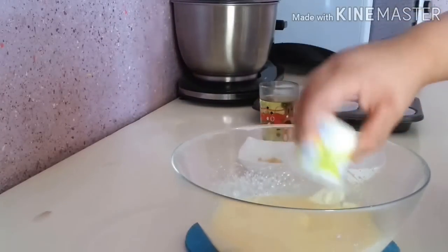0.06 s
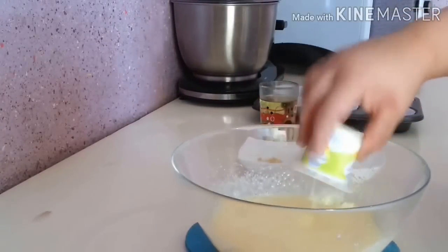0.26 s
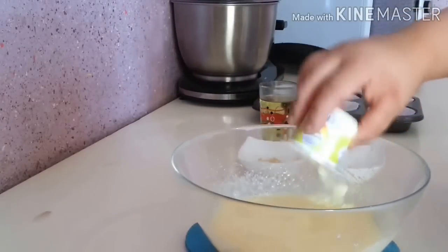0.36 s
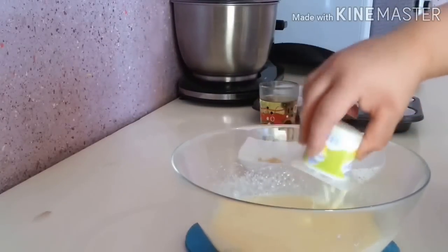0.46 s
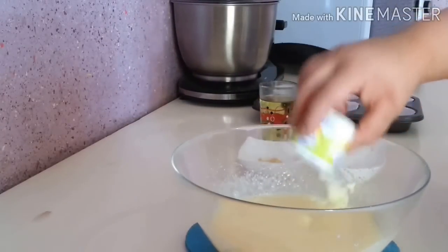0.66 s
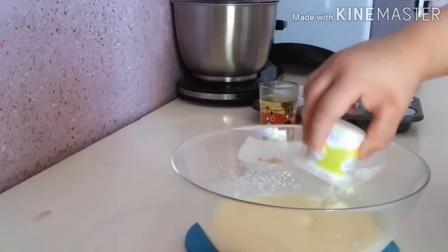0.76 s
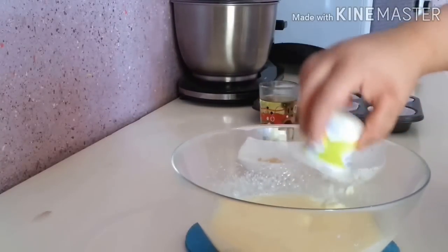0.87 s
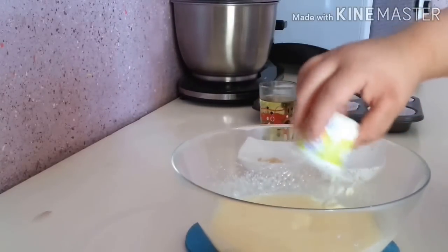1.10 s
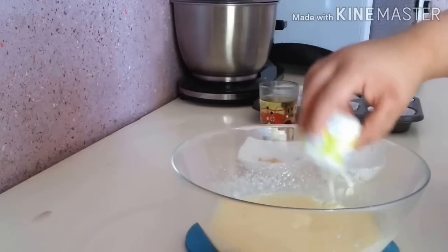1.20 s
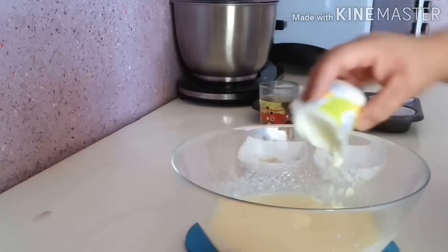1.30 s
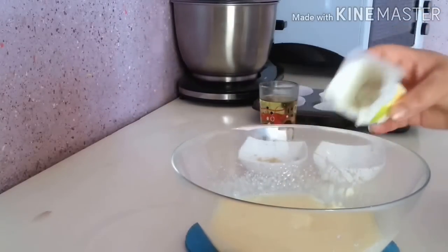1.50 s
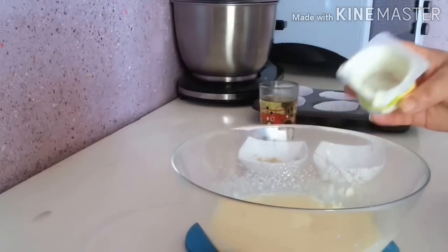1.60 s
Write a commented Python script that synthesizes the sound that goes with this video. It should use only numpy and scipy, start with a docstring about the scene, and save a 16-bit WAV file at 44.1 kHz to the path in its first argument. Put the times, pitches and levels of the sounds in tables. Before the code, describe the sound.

A plastic yogurt pot raps on a glass mixing bowl. After a faint plastic tick at about 0.1 seconds, eight sharp, hollow knocks run from 0.2 to 1.3 seconds, about equally loud and gradually speeding up. Each makes the glass ring lightly, with a short echo from the small kitchen. After the last knock, the ring fades into low room hiss by about 1.6 seconds.

```python
"""Low room hiss fills a small kitchen, and a plastic yogurt pot gives one faint tick in the hand.
The pot is then rapped eight times, ever faster, on a glass mixing bowl. Each impact excites free
vibrations: the pot's wall cracks, its base pops, its hollow thumps and the lightly damped glass rings.
The hard walls answer with reflections, and after the last rap the bowl rings down into the hiss."""
import sys
import numpy as np
from scipy import signal
from scipy.fft import rfft, irfft, next_fast_len
from scipy.io import wavfile

SR = 44100
rng = np.random.default_rng(int(sys.argv[2]) if len(sys.argv) > 2 else 0)


def output_pcm(signal):
    """Save a mono or channel-first signal as 16-bit PCM at the path in sys.argv[1].

    Samples are clipped to [-1, 1] before scaling.
    """
    pcm = np.clip(np.atleast_2d(signal).T, -1, 1) * 32767
    wavfile.write(sys.argv[1], SR, np.round(pcm).astype(np.int16))


N = 72765
SIDES = np.array([[.5], [-.5]])  # splits a left-right difference between the channels


def amp(db):
    """Decibels to amplitude ratio."""
    return 10 ** (np.asarray(db) / 20)


def along(points, hz):
    """Interpolation on a logarithmic frequency axis."""
    f, v = np.transpose(points)
    return np.interp(np.log(hz + 1), np.log(f + 1), v)


def filtered(x, response):
    """Linear filtering: spectrum times frequency response."""
    m = next_fast_len(N + SR // 2)
    return irfft(rfft(x, m) * response(np.fft.rfftfreq(m, 1 / SR)), m)[..., :N]


def coloured(x, curve_db):
    """Minimum-phase filtering: folding the cepstrum makes a dB curve causal."""
    m = 2 * next_fast_len(N)
    cepstrum = irfft(np.log(amp(curve_db(np.fft.rfftfreq(m, 1 / SR)))))
    cepstrum[1:m // 2] *= 2
    cepstrum[m // 2 + 1:] = 0
    return irfft(rfft(x, m) * np.exp(rfft(cepstrum)))[..., :N]


def highpass(x, hz, order):
    """Causal high-pass filtering."""
    return signal.sosfilt(signal.butter(order, hz, "high", fs=SR, output="sos"), x)


def since(s):
    """Seconds after s, zero before."""
    return np.maximum(np.arange(N) / SR - s, 0)


def rise(t, tau_s):
    """Exponential build-up."""
    return 1 - np.exp(-t / tau_s)


def mode(t, hz, t60_s, phase=0):
    """Damped harmonic oscillation."""
    return np.sin(2 * np.pi * hz * t + phase) * amp(-60 * t / t60_s)


def burst(t, t60_s):
    """Exponentially decaying noise."""
    return (t > 0) * rng.standard_normal(N) * amp(-60 * t / t60_s)


def cohered(pair, coherence):
    """Partial coherence: the balance of mid and side sets how alike two channels are."""
    def weights(f):
        angle = np.arccos(along(coherence, f)) / 2
        return np.array([np.cos(angle), np.sin(angle)])
    mid, side = filtered(pair, weights)
    return np.array([mid + side, mid - side])


# Spectrum of the room noise (frequency [Hz], level [dB])
HISS_SPECTRUM = [(18, -45), (30, -12.5), (160, -6), (197, -8), (324, 2), (420, -5.5), (575, -4),
                 (673, -6.5), (1020, -10.5), (2490, -12), (3590, -14), (4910, -16.5), (7460, -20),
                 (14000, -21.5), (15500, -68)]
# Its envelope (time [s], level [dB])
HISS_ENVELOPE = [(0, -48), (0.132, -49.5), (0.209, -50.5), (1.65, -51.5)]
# Its left-right likeness (frequency [Hz], coherence [1])
HISS_COHERENCE = [(50, 0.18), (200, 0.72), (800, 0.17), (3000, 0.083), (12000, 0.16)]
def hiss():
    """Ambient noise: a quiet random field, most coherent in the bass."""
    noise = cohered(rng.standard_normal((2, N)), HISS_COHERENCE)
    noise = filtered(noise, lambda f: amp(along(HISS_SPECTRUM, f)))
    level_db = np.interp(since(0), *np.transpose(HISS_ENVELOPE))
    return amp(level_db) * noise / np.sqrt(np.mean(noise ** 2))


def tick(start_s=.0886, centre_hz=4230, width_hz=1800):
    """Noise-excited resonance: the pot creaks softly once in the grip."""
    t = since(start_s)
    rub = burst(t, t60_s=0.021) * rise(t, 0.00052)
    resonance_db = lambda f: -10 * np.log10(1 + ((f - centre_hz) / (width_hz / 2)) ** 2)
    return amp(-25) * coloured(rub, resonance_db)


# Balance of the direct sound (frequency [Hz], left minus right [dB])
BALANCE = [(250, -.5), (1400, -1.5), (3000, 2.5), (5000, -5), (8000, -9), (14000, 0)]
def propagated(x, right_lag_s=.00003, echo_s=0.027):
    """Superposition of direct sound, early reflections and reverberation."""
    direct = filtered(x, lambda f: amp(SIDES * along(BALANCE, f))
                      * np.exp(2j * np.pi * f * right_lag_s * SIDES))
    # Bowl, worktop and the wall beside it reflect first.
    scatter = np.array([burst(since(0.0024), t60_s=0.042) for _ in range(2)])[:, :SR // 10]
    near = signal.fftconvolve(direct, scatter / np.linalg.norm(scatter[0]), axes=1)[:, :N]
    echo = filtered(near, lambda f: np.exp(-2j * np.pi * f * echo_s))  # nearest kitchen wall
    left, right = amp(-7) * near + amp(-16) * echo + amp(-2.5) * reverberation(x)
    mid_side = np.array([left + right, left - right]) / np.sqrt(2)
    # At two close points a diffuse field is alike in the bass.
    return direct + cohered(mid_side, coherence=[(250, 0.47), (600, 0.53), (1400, 0)])


# Reverberation time of the kitchen (frequency [Hz], T60 [s])
ROOM_DECAY = [(150, 0.47), (400, 0.3), (1200, 0.61), (2800, 0.54), (7000, 0.52), (14000, 0.3)]
# Colour of its reverberation (frequency [Hz], gain [dB])
ROOM_SPECTRUM = [(100, 4), (230, 1), (320, -6), (420, 5.5), (750, 6), (950, 3.5), (1400, -3), (2000, 0.5),
                 (4500, -0.5), (8000, 0.5), (13000, -2)]
def reverberation(x):
    """Diffuse decay: each frequency dies away at its own rate."""
    hz, t, spectra = signal.stft(rng.standard_normal((2, SR * 2 // 3)), SR, nperseg=256)
    tail = signal.istft(spectra * amp(-60 * t / along(ROOM_DECAY, hz)[:, None]), SR, nperseg=256)[1]
    tail *= rise(np.arange(tail.shape[1]) / SR, 0.0017)
    wet = signal.fftconvolve(x[None], tail / np.linalg.norm(tail[0]), axes=1)[:, :N]
    return filtered(wet, lambda f: amp(along(ROOM_SPECTRUM, f) + 0.61 * SIDES * along(BALANCE, f)))


# Stiff modes of the pot's wall (frequency [Hz], level [dB], T60 [s])
WALL_MODES = [(1254, -19, 0.058), (1950, -13.5, 0.0052), (2680, -12, 0.0065), (2971, -16.5, 0.028),
              (3647, -15.5, 0.016), (4488, -27.5, 0.021), (5620, -35, 0.0053), (7770, -40.5, .008),
              (8390, -20, 0.0074)]
def pot_wall(t):
    """Modal superposition: the wall's modes start together, alternating in sign."""
    return sum((-1) ** (k + 1) * amp(db + rng.normal(0, 1)) * mode(t, hz, t60)
               for k, (hz, db, t60) in enumerate(WALL_MODES))


# Snap of the plastic (frequency [Hz], gain [dB])
CRACK_SPECTRUM = [(60, -48), (170, -42), (280, -7), (420, -15.5), (730, -5), (950, -6), (1300, -17.5),
                  (2700, 6), (3300, -15.5), (4200, 0.5), (5500, -8.5), (8000, -11.5), (11000, -12.5),
                  (14500, -24)]
def pot_crack(t):
    """Impulse response: the plastic gives a broadband snap with fine crackle."""
    snap = np.diff(1.0 * (t > 0), prepend=0)
    crackle = highpass(burst(t, t60_s=0.02), hz=3000, order=2)
    return amp(11.5) * coloured(snap + amp(-16) * crackle, lambda f: along(CRACK_SPECTRUM, f))


def pot_base(t, hz):
    """Heavily damped plate vibration: the base pops."""
    return amp(0.5) * mode(t, hz, t60_s=0.009) * rise(t, 0.00061)


def pot_hollow(t, thump_db, cup_hz, cup_db, lift_hz_per_s=390):
    """Cavity resonance: the air thumps, rising in pitch as the pot lifts away."""
    thump = amp(thump_db - 22.5) * mode(t, 260 + lift_hz_per_s * t / 2, t60_s=0.054)
    # A higher air resonance is set by how the pot sits on the bowl.
    cup = amp(cup_db - 30.5) * mode(t, cup_hz, t60_s=0.099)
    return (thump + cup) * rise(t, 0.0046)


def pot_shell(s, base_hz, base_db, bright_db, shelf_hz=4300):
    """Radiation from small panels: wall and base shed little bass; the crack joins them."""
    t = since(s)
    panels = pot_wall(t) + amp(base_db) * pot_base(since(s + 0.00025), base_hz)
    radiated = highpass(panels, hz=1125, order=8) + pot_crack(t)
    return coloured(radiated, lambda f: bright_db * f ** 2 / (f ** 2 + shelf_hz ** 2))


# Modes of the bowl (frequency [Hz], level [dB], T60 [s], left minus right [dB])
BOWL_MODES = [(316, -41, .45, 0), (512, -51, .5, 0), (752, -48, .35, 0), (873, -46, .55, 0),
              (1251, -38, .3, 0), (1353, -34, .75, 0), (1478, -40, .3, 0), (1540, -39, .38, 0),
              (2099, -40, .65, 0), (2515, -42, .4, 0), (2691, -42, .35, 0), (3994, -39, .48, -2),
              (4112, -39, .32, -2), (5098, -50, .5, -3)]
def bowl(s, next_s, ping_db, damping_s=0.0073):
    """Free vibration: the glass rings until the next contact damps it."""
    t = since(s)
    modes = [(hz, db + 1, t60, pan_db) for hz, db, t60, pan_db in BOWL_MODES]
    modes.append((2974, ping_db - 23.5, 0.44, -15.5))  # the strongest depends on the spot struck
    ring = 0
    for hz, db, t60, pan_db in modes:
        phases = rng.uniform(0, 2 * np.pi) + rng.normal(0, 0.55, (2, 1))
        ring += amp(db + SIDES * pan_db) * mode(t, hz, t60, phases)
    ring *= rise(t, 0.0053) * np.exp(-since(next_s) / damping_s)
    return ring + amp(-21) * reverberation(ring.mean(0))


# Impacts of pot on bowl (time [s], level [dB], base pitch [Hz], base gain [dB], thump gain [dB],
# cup resonance [Hz], cup gain [dB], glass ping gain [dB], treble shelf [dB])
RAPS = [(.2340, -2, 1400, 3.5, 2, 709, 3, -0.5, -4), (.4125, 0.5, 1583, -0.5, 3, 740, 5.5, 3, 0),
        (0.5704, -0.5, 1452, -0.5, -1.5, 511, 2, 1, 1.5), (0.7278, -0.5, 1448, 0, 3, 627, -8, -0.5, 2),
        (0.8788, 1, 1303, -2, -1, 780, -29, -1, -2), (1.0188, 2, 1315, -2, -1, 835, -7, 0, -3),
        (1.1491, -0.5, 1422, 3, -1, 813, 3, 2, 0), (1.2686, 0.5, 1515, 1, -0.5, 855.5, 6, 4, 0)]
def scene():
    """Linear superposition: hiss, tick, then raps that each excite both pot and bowl."""
    out = hiss() + propagated(tick())
    next_times = [row[0] for row in RAPS[1:]] + [N / SR]
    for rap, next_s in zip(RAPS, next_times):
        s, db, base_hz, base_db, thump_db, cup_hz, cup_db, ping_db, bright_db = rap
        shell = pot_shell(s, base_hz, base_db, bright_db)
        hollow = pot_hollow(since(s), thump_db, cup_hz, cup_db)
        out += amp(db) * (propagated(shell + hollow) + bowl(s, next_s, ping_db))
    return out


def record(dry):
    """Saturation and band limiting: the phone rounds the highest peaks and cuts the top treble."""
    edge_hz, top_hz = 14700, 16600
    rounded = dry / (1 + np.abs(dry) ** 8) ** (1 / 8)
    return filtered(rounded, lambda f: amp(-np.maximum(f - edge_hz, 0) / 60) * (f < top_hz))


dry = scene()
out = record(dry)
output_pcm(out)
```